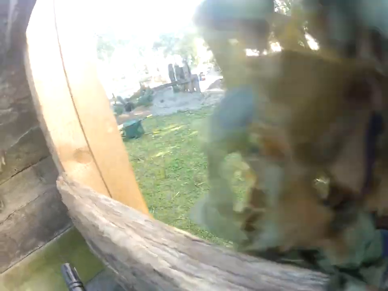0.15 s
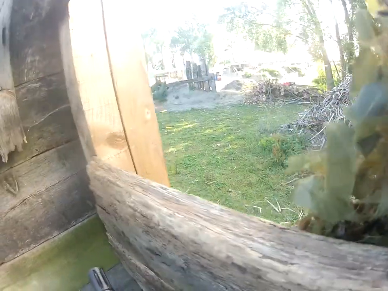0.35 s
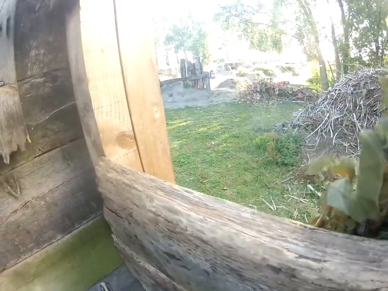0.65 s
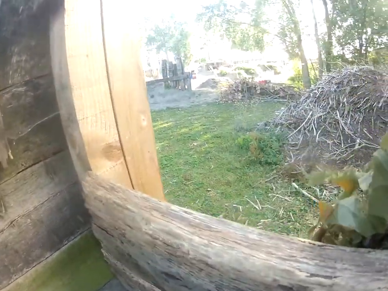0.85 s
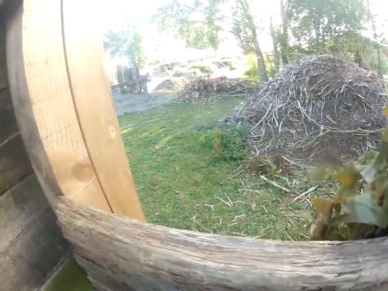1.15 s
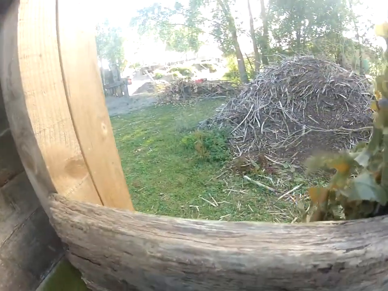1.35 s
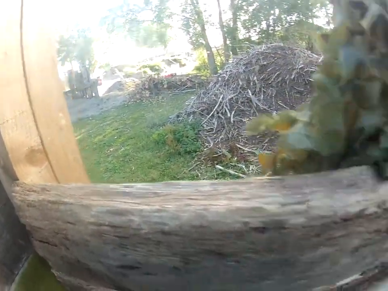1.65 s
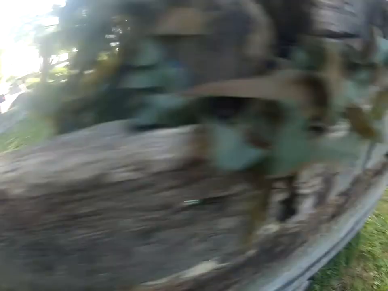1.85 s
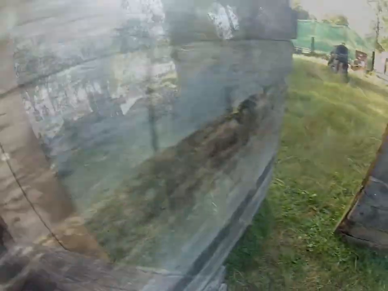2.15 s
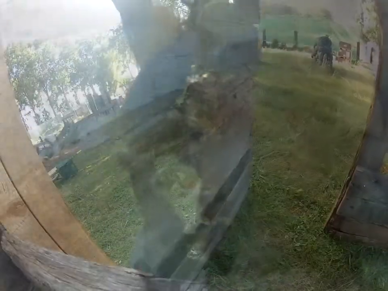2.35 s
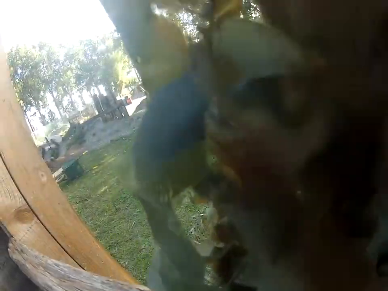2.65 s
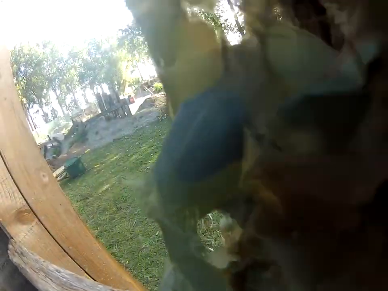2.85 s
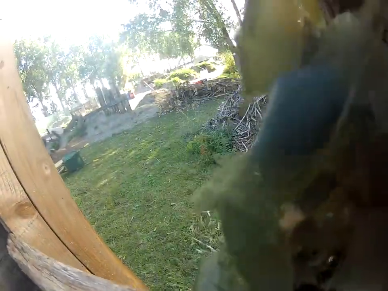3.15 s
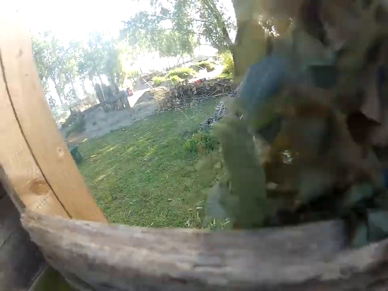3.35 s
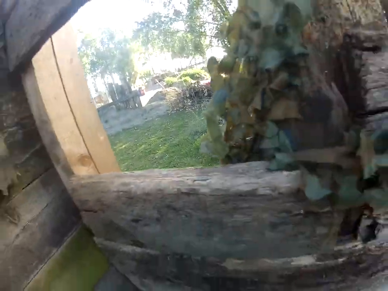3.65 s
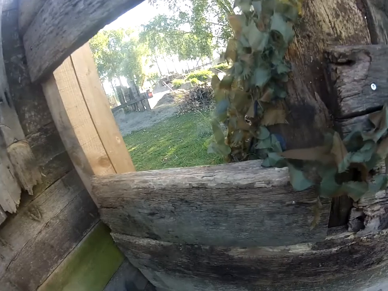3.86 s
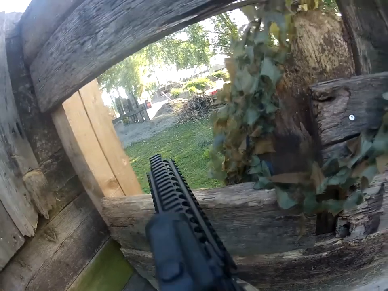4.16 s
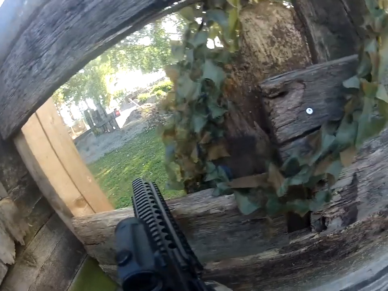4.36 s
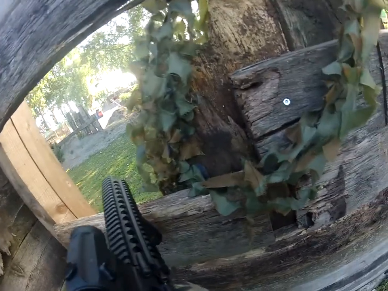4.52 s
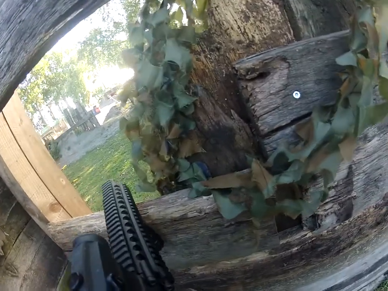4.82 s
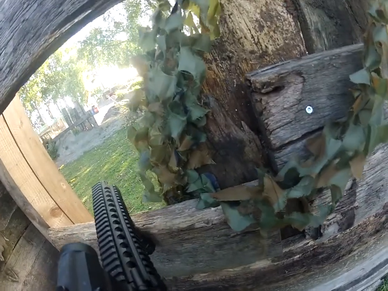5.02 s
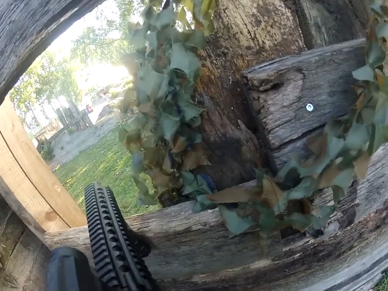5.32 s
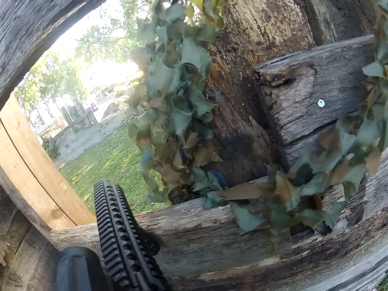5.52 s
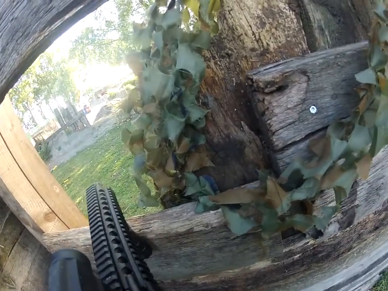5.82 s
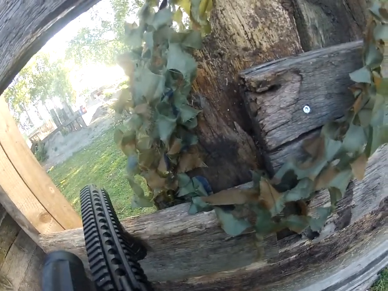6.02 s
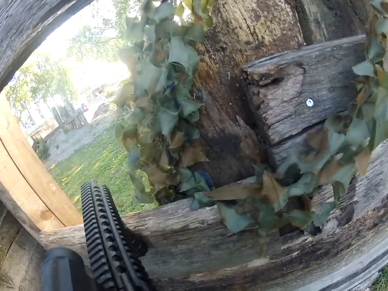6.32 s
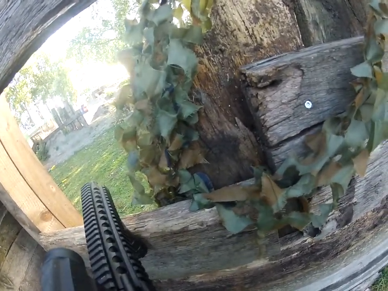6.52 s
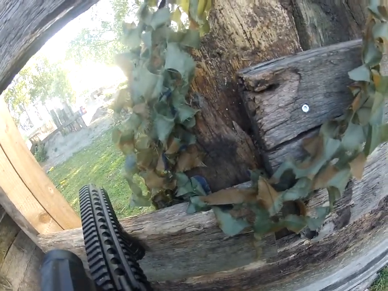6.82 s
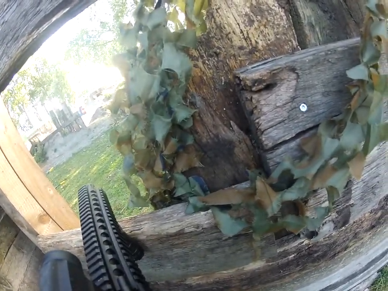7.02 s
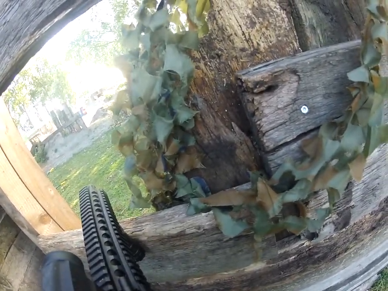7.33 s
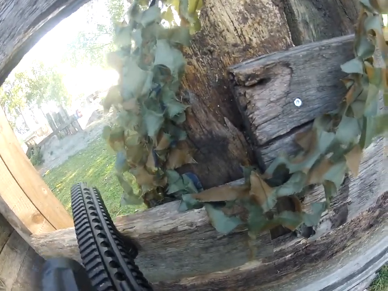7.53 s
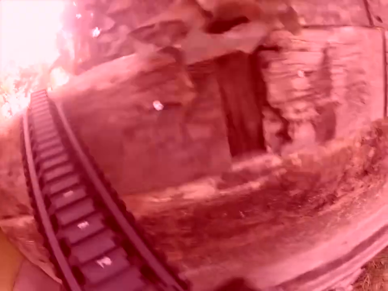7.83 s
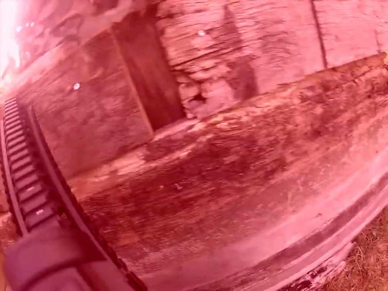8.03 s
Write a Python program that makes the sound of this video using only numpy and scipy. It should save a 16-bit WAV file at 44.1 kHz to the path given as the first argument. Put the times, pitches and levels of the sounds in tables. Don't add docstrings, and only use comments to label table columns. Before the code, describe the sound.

A close, muffled head-camera sound outdoors, sealed in resonant plastic. From 0 to 4 seconds there is faint low hush, soft strap wobble and sparse gear ticks: a click at 0.2, a double tick at 1.0, a scrape with thin webbing squeaks around 1.75 to 2.3, a dull bump at 2.6, and light netting rustle near 3. Heavier low jolts and knocks come at 4.25 to 4.6, with smaller ones to 5.6. From 5.8 to 6.9 an electric airsoft rifle fires six single shots about 0.2 seconds apart, each a brief motor whir, gear rasp and bright piston clack with ringing. Knocks follow at 7.06 and 7.24. At 7.4 a seventh pull is masked by a pellet crack at 7.44; others hit at 7.66, 7.81 and 7.93, shrill and distorted, with deep thumps, scraping and rattling as the head flinches. The level ducks, then fades to hush after 8.

```python
import sys
import numpy as np
from scipy import signal
from scipy.fft import rfft, irfft, next_fast_len
from scipy.io import wavfile
from scipy.ndimage import uniform_filter1d, map_coordinates

SR = 44100
rng = np.random.default_rng(int(sys.argv[2]) if len(sys.argv) > 2 else 0)


def natural_amplitude(level_db):
    exponent = np.asarray(level_db, float) / 20
    return 10 ** exponent


def transcribe(u):
    v = np.clip(np.atleast_2d(u).T, -1, 1)
    q = np.round(v * 32767).astype(np.int16)
    wavfile.write(sys.argv[1], SR, q)


N = 360738


def unit(x):
    return x / np.sqrt(np.mean(x ** 2) + 1e-20)


def seconds():
    return np.arange(N) / SR


def sine(hz, start_s=0.):
    return np.sin(2 * np.pi * hz * (seconds() - start_s))


def along(points, hz):
    f, v = np.transpose(points)
    return np.interp(np.log(hz + 1), np.log(f + 1), v)


def wobble(rate_hz):
    knots = rng.standard_normal(int(N * rate_hz / SR) + 4)
    return map_coordinates(knots, [np.arange(N) * rate_hz / SR])


def filtered(x, response):
    m = next_fast_len(N + SR // 2)
    return irfft(rfft(x, m) * response(np.fft.rfftfreq(m, 1 / SR)), m)[..., :N]


def mode(f, hz, width_hz):
    return 1j * f * width_hz / (hz * hz - f * f + 1j * f * width_hz)


def burst(s, db, t60, hold=0., rise=0.000089):
    out, t = np.zeros(N + SR), np.arange(SR // 2) / SR
    decay = natural_amplitude(db - 60 * np.clip(t - hold, 0, 1) / t60)
    out[round(s * SR):][:len(t)] = decay * (1 - np.exp(-t / rise))
    return out[:N]


def swells(rows, rise_db_s, fall_db_s):
    t, out = seconds(), np.full((2, N), -120.)
    for s, hold, *db in rows:
        before = rise_db_s * np.clip(s - t, 0, None)
        after = fall_db_s * np.clip(t - s - hold, 0, None)
        out = np.maximum(out, np.c_[db] - before - after)
    return uniform_filter1d(out, size=131, axis=1)


def grit(lumpy_db):
    return unit(rng.standard_normal(N) * natural_amplitude(lumpy_db * wobble(500)))


# (frequency [Hz], width [Hz], level [dB])
CASE = [(1004, 370, -9), (1230, 130, -3.5), (1900, 184, 3), (2370, 110, -0.5), (2800, 240, -10),
        (3370, 160, -11.5), (3660, 120, -6), (4900, 100, -29), (5430, 560, -17.5)]


def case(x):
    def ring(f):
        return sum((-1) ** k * natural_amplitude(db) * mode(f, hz, width) for k, (hz, width, db) in enumerate(CASE))
    return filtered(x, ring)


# (frequency [Hz], level [dB])
EDGE = [(1500, -23), (2500, -2.5), (3500, 1), (4500, -10.5), (5500, -2)]


def edge():
    return unit(filtered(grit(lumpy_db=2.5), lambda f: natural_amplitude(along(EDGE, f))))


# (frequency [Hz], density [dB per Hz])
AIR = [(15, -27.5), (25, 3.5), (64, -10.5), (82, -4), (113, -11.5), (289, -11), (388, -15), (657, -22),
       (720, -24), (1190, -25), (1920, -24.5), (5260, -32.5), (5900, -35.5), (7670, -85.5), (13000, -120)]


def air():
    hush = unit(filtered(rng.standard_normal(N), lambda f: natural_amplitude(along(AIR, f))))
    return natural_amplitude(-63 + 0.35 * wobble(8.4)) * hush


# (time [s], hold [s], sway [dB], knock [dB])
BUMPS = [(.02, 0.0085, -60, -62), (.14, 0.032, -58, -73), (.4, 0.026, -55.5, -64), (.92, .01, -73, -70),
         (.99, 0.065, -63, -73), (1.28, 0.019, -61, -72), (1.51, .03, -71, -80), (1.73, 0.065, -65, -58.5),
         (1.82, 0.19, -56, -59.5), (2.49, 0.023, -62, -69), (2.6, 0.018, -44.5, -48), (3.0, .01, -67, -76),
         (3.435, 0.0081, -52.5, -63), (3.56, .01, -57, -70), (3.7, .04, -60, -78),
         (3.935, 0.012, -59.5, -60), (4.18, 0.022, -61, -68), (4.27, 0.086, -34, -45),
         (4.425, 0.0056, -28.5, -41.5), (4.49, 0.019, -43, -44), (4.55, 0.045, -46.5, -47),
         (4.64, 0.056, -58, -48.5), (4.72, 0.014, -45, -52), (4.89, 0.034, -56, -54),
         (4.95, 0.14, -51.5, -54.5), (5.075, 0.016, -44, -43), (5.19, 0.039, -43, -53),
         (5.31, 0.11, -60.5, -60), (5.485, 0.01, -44.5, -56.5), (5.59, 0.057, -53.5, -61.5)]
# (time [s], hold [s], sway [dB], knock [dB])
RECOIL = [(5.808, 0.02, -39, -37), (5.861, 0.0081, -31.5, -32.5), (6.017, 0.075, -26.5, -31.5),
          (6.21, 0.005, -24, -30), (6.277, 0.019, -34.5, -34.5), (6.405, 0.08, -25, -32),
          (6.641, 0.054, -26, -33), (6.735, 0.0086, -28.5, -42), (6.8, 0.021, -41.5, -56),
          (6.864, 0.052, -40, -32.5), (6.935, 0.039, -29, -46), (7.401, 0.029, -33.5, -33.5),
          (7.465, 0.0085, -35, -45), (7.514, 0.074, -39.5, -47), (7.682, 0.067, -44, -43),
          (7.841, 0.059, -18, -26), (7.953, 0.042, -41, -47), (8.06, 0.068, -62, -59)]
SHAKE_RISE_DB_S, BUMP_FALL_DB_S, RECOIL_FALL_DB_S = 2100, 380, 227
REST_DB = -72.5


def shaking():
    bumps = swells(BUMPS, SHAKE_RISE_DB_S, BUMP_FALL_DB_S)
    recoil = swells(RECOIL, SHAKE_RISE_DB_S, RECOIL_FALL_DB_S)
    tremor = REST_DB + 4 * np.array([wobble(9.7), wobble(11)])
    sway_db, knock_db = np.max([bumps, recoil, tremor], axis=0)
    sway_hz = 58 * natural_amplitude(1.1 * wobble(14))
    sway = np.sqrt(2) * np.sin(2 * np.pi * np.cumsum(sway_hz) / SR) * natural_amplitude(2 * wobble(25))

    def strap(f):
        return (mode(f, 61, 69) - natural_amplitude(-0.5) * mode(f, 161.6, 74)) * mode(f, 139.3, 400) ** 3
    loose = filtered(rng.standard_normal(N), strap)
    loose /= np.sqrt(np.abs(uniform_filter1d(loose ** 2, round(0.023 * SR))))
    return natural_amplitude(sway_db) * sway + natural_amplitude(knock_db) * loose


# (time [s], peak [dB], brightness [dB], own note [Hz], note level [dB])
TICKS = [(0.197, -42, -3, 1925, -5), (1.004, -51, -22, 3620, 11), (1.005, -48.5, -19, 1790, 2.5),
         (1.339, -66, -14, 3700, -5), (1.714, -59, -23, 1230, -1.5), (1.75, -59, -7, 1930, 6),
         (1.759, -45.5, -32, 1596, 2), (1.762, -55.5, -18, 3680, 11.5), (1.861, -55, -18, 1190, -10),
         (1.957, -80, -1, 1800, -16), (2.014, -66, -6, 1850, -11), (2.155, -61.5, -19, 1920, 3.5),
         (2.279, -71, -13, 1110, -4), (2.896, -56.5, -19, 1900, -5), (3.168, -66, -12, 2400, -9),
         (4.268, -37, -20, 1786, -9), (4.311, -58, -26, 1240, 6.5), (4.46, -65, -33, 1123, 14.5),
         (4.552, -56.5, -7, 719, -17), (4.73, -64, -5, 1810, -9), (4.899, -70, 3, 770, -6),
         (5.26, -57.5, -20, 1060, 4.5), (5.288, -42, -10, 1737, -6.5), (5.607, -41, -6.5, 1790, -5.5)]
# (time [s], peak [dB], brightness [dB], own note [Hz], note level [dB])
KNOCKS = [(5.92, -58, 7, 2800, -7), (5.938, -40.5, -9, 1850, -19), (6.521, -42.5, -9, 738, -26),
          (6.745, -46, -23, 1880, -6), (7.064, -34, -7, 1850, -9), (7.238, -33, -5.5, 3150, -6),
          (7.571, -54.5, -22, 675, 3.5), (7.623, -32.5, -2, 2375, -9), (7.855, -23, -19, 1475, 7),
          (7.883, -22.5, -24, 1875, 2), (7.866, -46.5, 11, 4500, -12), (7.893, -44.5, 9, 4500, -12.5),
          (7.906, -45, 8.5, 1900, 4), (7.938, -27, -11.5, 1783, 1), (7.961, -40.5, -10, 1023, -4)]
TICK_T60_S, KNOCK_T60_S = 0.043, 0.053


def ticks():
    ring, bright, notes = np.zeros((3, N))
    for rows, t60 in ((TICKS, TICK_T60_S), (KNOCKS, KNOCK_T60_S)):
        for s, db, bright_db, hz, note_db in rows:
            ring += burst(s, db, t60, hold=0.0025)
            bright += burst(s, db + bright_db + 2.5, 0.61 * t60, hold=0.0025)
            note_t60 = t60 * min(1, 1900 / hz)
            notes += burst(s, db + note_db, note_t60, hold=3.3 / max(hz, 1700)) * sine(hz, s)
    ring = natural_amplitude(8.0) * case(ring * grit(lumpy_db=0.0))
    return ring + natural_amplitude(4.5) * bright * edge() + notes * natural_amplitude(4.4 * wobble(720))


# (centre [s], length [s], note
# [Hz], level [dB])
SCRAPES = [(1.012, 0.011, 2640, -48.5), (1.017, .014, 1870, -55), (1.747, 0.022, 4900, -62),
           (1.763, 0.0089, 650, -41.5), (1.764, 0.0057, 1160, -39.5), (1.961, 0.013, 4730, -60),
           (2.901, .006, 3500, -67), (3.079, 0.078, 2050, -64), (3.168, 0.012, 3900, -64),
           (3.203, 0.066, 2400, -71), (4.294, 0.035, 570, -53.5), (4.433, 0.031, 596, -58),
           (4.465, 0.016, 900, -72),
           (7.516, 0.039, 1900, -57), (7.56, 0.033, 1900, -61), (7.753, 0.027, 2200, -38.5),
        (7.445, 0.0067, 330, -19), (7.818, 0.0079, 280, -14), (7.84, 0.015, 1700, -24.5),
        (7.844, 0.0076, 3600, -37), (7.864, 0.004, 4000, -40.5), (7.859, 0.0056, 1390, -8.5),
        (7.864, .003, 4480, -33.5), (7.869, 0.047, 1200, -27.5), (7.885, .004, 3210, -29),
        (7.895, 0.0032, 4500, -40), (7.904, 0.0043, 4500, -38), (7.917, 0.03, 1500, -31),
        (7.922, 0.014, 3160, -43), (7.936, 0.014, 3670, -51.5), (7.94, 0.0037, 3480, -32.5),
        (7.977, 0.012, 1680, -58.5), (7.986, 0.012, 4420, -54), (8.022, 0.0057, 4290, -55),
        (8.041, 0.044, 1700, -55),
           (.2, .01, 2600, -52), (0.201, 0.0092, 1400, -56), (1.356, .012, 3700, -62.5),
           (1.402, .008, 3400, -65.5), (1.007, 0.0086, 2920, -46), (1.861, .006, 2400, -62),
           (1.762, 0.0069, 855, -44), (1.763, 0.009, 1500, -41), (2.9, .006, 2300, -64),
           (4.27, .012, 1310, -49), (7.239, 0.0054, 3300, -37), (7.397, 0.0074, 3190, -32),
           (7.421, .005, 2990, -32), (7.574, 0.01, 557, -45), (7.858, .005, 1800, -17),
           (7.886, .005, 1900, -20), (7.885, .004, 3590, -27.5)]
# (centre [s], length [s], note [Hz], level [dB])
SQUEAKS = [(1.776, 0.12, 1160, -61), (1.787, .07, 1900, -72), (1.89, 0.19, 1230, -67),
           (1.7, 0.14, 1890, -68.5), (2.04, .04, 1930, -72), (2.122, 0.18, 1800, -70),
           (2.11, .08, 1090, -73), (2.265, .03, 4570, -73), (2.28, 0.033, 1100, -67), (1.8, .01, 4900, -72),
           (2.015, .012, 4600, -72), (7.831, 0.014, 2440, -15.5), (7.829, .016, 1950, -26),
           (7.843, .014, 3750, -38.5), (7.888, 0.01, 1177, -22), (7.889, .012, 1876, -27),
           (7.9, 0.025, 1870, -29.5), (7.913, 0.04, 1189, -19.5), (7.928, 0.015, 1810, -19),
           (7.92, 0.022, 2600, -22.5), (7.926, 0.013, 3400, -41)]


def scrapes():
    t, noise, out = seconds(), grit(lumpy_db=3), np.zeros(N)
    for rows, sharp_q in ((SCRAPES, 2.6), (SQUEAKS, 10)):
        for s, length, hz, db in rows:
            peak = signal.iirpeak(hz, sharp_q, SR)
            note = unit(signal.lfilter(*peak, signal.lfilter(*peak, noise)))
            out += natural_amplitude(db) * np.exp(-((t - s) / (0.33 * length)) ** 2) * note
    return out


# (time [s], hold [s], dull [dB], bright [dB])
RUB = [(1.78, 0.083, -70.5, -80), (1.85, 0.17, -71.5, -74), (2.07, 0.12, -75, -84), (2.28, 0.021, -72, -70),
       (2.92, 0.13, -81, -71.5), (3.06, 0.099, -88, -68), (3.16, 0.075, -83, -70),
       (4.46, 0.0082, -65.5, -87), (4.555, 0.026, -70, -70), (4.74, 0.017, -86, -62),
       (7.49, 0.13, -64.5, -59), (7.745, 0.029, -47.5, -45.5), (7.83, 0.012, -22, -38),
       (7.86, 0.028, -45, -43), (7.9, 0.027, -25, -44)]


def rubbing():
    dull_db, bright_db = swells(RUB, rise_db_s=1200, fall_db_s=1800)
    slips = natural_amplitude(3.5 * wobble(120))
    dull = filtered(case(grit(lumpy_db=1.5)), lambda f: mode(f, 900, 1600) ** 2)
    return slips * (natural_amplitude(dull_db) * unit(dull) + natural_amplitude(bright_db) * edge())


# (time [s], peak [dB], frequency [Hz])
JOLTS = [(2.596, -47, 109), (4.259, -22, 125), (4.314, -18.5, 118), (4.417, -26, 105), (4.545, -28, 125),
         (4.892, -42, 126), (5.074, -46, 130), (5.805, -27, 132), (5.866, -17, 100), (5.938, -28, 160),
         (6.009, -18.5, 188), (6.196, -23, 194), (6.394, -21.5, 155), (6.628, -33, 109),
         (6.664, -16.5, 146), (6.856, -20, 150), (7.395, -23, 151.5), (7.853, -1.5, 171),
         (7.883, -2.5, 205)]
# (time [s], peak [dB], frequency [Hz])
FLINCH = [
    (7.816, -4, 48.5),
    (7.859, -13, 37.5),
    (7.893, -6, 42.5),
]


def jolts():
    return sum(-burst(s, db - 3.5, t60=9 / hz, rise=0.0014) * sine(hz, s) for s, db, hz in JOLTS + FLINCH)


# (time [s], peak [dB])
RATTLE = [(7.8083, -10), (7.8381, -35.5), (7.8418, -33), (7.8636, -32.5), (7.8837, -33), (7.9046, -35.5),
          (7.9151, -35.5), (7.9226, -21), (7.9351, -13.5)]
# (time [s], peak [dB])
RUSTLE = [(2.8973, -55), (2.9262, -63), (3.005, -59), (3.0669, -56), (3.1203, -59), (3.1512, -59),
          (3.1682, -51.5), (3.218, -60), (3.2455, -61)]


def rattle():
    near = sum(burst(s, db - 1, t60=.012, hold=.0008) for s, db in RATTLE)
    soft = sum(burst(s, db - 9.5, t60=0.027, hold=.002) for s, db in RUSTLE)
    soft_noise = unit(filtered(grit(lumpy_db=0.5), lambda f: mode(f, 2960, 2200) ** 2))
    return near * edge() + soft * soft_noise


# (gear catches piston [s], piston slams [s], motor [dB], slam [dB])
SHOTS = [
    (5.8007, 5.8646, -43, -21.5),
    (6.0086, 6.0664, -43, -21),
    (6.1954, 6.2537, -43.5, -21),
    (6.393, 6.4525, -43.5, -20.5),
    (6.625, 6.6833, -43.5, -20.5),
    (6.8558, 6.915, -43, -20.5),
    (7.3928, 7.444, -43, -54),
]
# (time after catch [s], level [dB])
PULL = [(0, 0.5), (.003, 2.5), (.008, -5.5), (.022, -9), (.034, -12), (.041, -0.5), (.046, 6), (.052, 0),
        (.058, -12)]
# (time after catch [s], level [dB], hold [s])
CATCHES = [(.0075, -3.5, 0.00055), (0.025, 0.5, 0.0024), (0.036, 1.5, .002), (0.0427, 1, .0006),
           (0.0476, 5, .0015)]
# (frequency [Hz], level [dB], t60 [s])
SHELL = [(1150, -17, .025), (1930, -4, .05), (2340, -9, .03), (2820, -5, .03), (3250, -6, .024),
         (3760, -3, .022), (4510, -6, .014), (5090, -5, .014)]
# (frequency [Hz], level [dB], t60 [s])
SPRING = [(2830, -29, .3), (3740, -29, .28)]
TRIGGER_S, SPIN_S, RASP_DB = 0.05, 0.029, -30.5


def rifle():
    t, pull = seconds(), np.transpose(PULL)
    motor, rasp, snaps, slam, whine = np.zeros((5, N))
    for catch, hit, motor_db, slam_db in SHOTS:
        trigger, spin = catch - TRIGGER_S, catch - SPIN_S
        times = [trigger, trigger + 0.0055, spin, spin + .004, catch, hit + 0.036, hit + 0.078, hit + 0.14]
        wind_up_db = motor_db + np.array([-6, -7.0, 1.0, 3, 6.5])
        coast_db = slam_db - np.array([22, 38, 50])
        motor += natural_amplitude(np.interp(t, times, [*wind_up_db, *coast_db], -120, -120))
        rasp += natural_amplitude(RASP_DB + np.interp(t - catch, *pull, -120, -120))
        for s, db, hold in CATCHES:
            snaps += burst(catch + s, RASP_DB + db + rng.normal(0, 1.1), t60=0.026, hold=hold)
        slam += burst(hit + .0003, slam_db - 11, t60=.05, hold=.003)
        slam += burst(hit + 0.0099, slam_db - 37.5, t60=0.23)
        for hz, db, t60 in SHELL:
            ring = burst(hit + .0004, slam_db + db + rng.normal(0, 1), t60, hold=.0025, rise=.0003)
            whine -= ring * np.cos(2 * np.pi * hz * (t - hit - .001))
        for hz, db, t60 in SPRING:
            ring = burst(hit + .001, slam_db + db + rng.normal(0, 2), t60, rise=.0015)
            whine += ring * np.sin(2 * np.pi * hz * t + 1.5 * wobble(90))
        pitch_hz = np.interp(t, [spin, catch - .008], [1150, 1520])
        swell = np.sin(np.pi * np.clip((t - spin + .004) / (catch - spin - 0.004), 0, 1))
        pinion = np.sin(2 * np.pi * np.cumsum(pitch_hz) / SR + 1.1 * wobble(250))
        whine += natural_amplitude(motor_db - 4 + 4 * wobble(200)) * swell * pinion
    tooth = np.cumsum(236 + 40 * wobble(90)) / SR % 1
    teeth = unit(natural_amplitude(-15 * tooth + 2 * wobble(200)))
    gears = (motor + rasp * teeth + snaps) * grit(lumpy_db=0)

    def gearbox(f):
        return mode(f, 2900, 2200) ** 2 + natural_amplitude(-10.5) * mode(f, 510, 120) + natural_amplitude(-7) * mode(f, 1040, 150)
    train = natural_amplitude(3.5) * case(gears) + filtered(gears, gearbox)
    thud = natural_amplitude(18.5) * case(slam * grit(lumpy_db=0.5))
    return train + thud + (natural_amplitude(9.5) * slam + natural_amplitude(-1.0) * snaps) * edge() + whine


# (time [s], contact [s], thump [dB], thump [Hz])
PELLETS = [
    (7.4448, 0.0055, -6.5, 175.6),
    (7.6607, 0.0041, -9.5, 210),
    (7.809, 0.0059, 4.5, 197.4),
    (7.935, 0.0028, -9.5, 200),
]
# (frequency [Hz], level [dB])
WALLS = [
    [(1210, -11.5), (1940, -9.5), (2850, -7), (3300, -10.5), (3770, -5)],
    [(560, -15), (1890, 0.5), (2600, -11.5), (3110, -12.5), (3730, -8.5)],
    [(1170, -9.5), (1750, -6), (2420, -2.5)],
    [(1100, -1.5), (1820, -0.5), (2290, -8), (3830, -15.5)],
]
# (time [s], frequency [Hz], level [dB], t60 [s])
BUCKLE = [
    (6.945, 2830, -50, .3),
    (6.945, 3740, -55, .4),
    (7.46, 705, -48, .7),
    (7.67, 850, -43, .2),
    (7.685, 2140, -51, .3),
]


def pellets():
    crack, out = np.zeros((2, N))
    pellet_db = 0.5
    for (s, contact, thump_db, thump_hz), wall in zip(PELLETS, WALLS):
        t = seconds() - s
        blow = burst(s, pellet_db, t60=0.0073, hold=contact, rise=.0001)
        crack += blow
        for hz, note_db in wall:
            level = natural_amplitude(note_db + 1.5 * wobble(500))
            out += blow * level * np.sin(2 * np.pi * hz * t + .35 * wobble(500))
        tail = burst(s, pellet_db - 27.5, t60=0.038, hold=contact)
        out += tail * sum(sine(hz, s) for hz in (520, 1150, 2300))
        thump = burst(s, thump_db, t60=0.0081, hold=contact + 0.002, rise=0.003)
        out -= thump * sine(thump_hz, s)
    for s, hz, db, t60 in BUCKLE:
        out += burst(s, db, t60, rise=.006) * sine(hz)
    ring = natural_amplitude(6) * case(crack * grit(lumpy_db=1.5))
    broad = natural_amplitude(-2.0) * filtered(crack * grit(lumpy_db=0.5), lambda f: mode(f, 2300, 2700))
    return out + ring + natural_amplitude(-6.5) * crack * edge() + broad


def scene():
    handling = air() + shaking() + ticks() + scrapes() + rubbing() + jolts() + rattle()
    return (handling + rifle() + pellets())[None]


def band_limit(x):
    return signal.sosfilt(signal.butter(12, 16500, fs=SR, output="sos"), x)


def record(dry):
    over = np.roll(np.abs(dry) > .7, round(.007 * SR), axis=1)
    duck = signal.lfilter([1], [1, -np.exp(-1 / (.035 * SR))], over)
    x = dry * natural_amplitude(-11 * np.tanh(duck / 12))
    x = x / (1 + np.abs(x / .58) ** 8) ** (1 / 8)
    x = filtered(x, lambda f: 1 / (1 + (f / 5750) ** 40))
    hold_hz, hold_phase_rad = 12000, -2.19
    mirrored = x * (1 + 2 * np.cos(2 * np.pi * hold_hz * seconds() + hold_phase_rad))
    # (frequency [Hz], level [dB])
    colour = [(10900, 1.0), (11300, -0.5), (12000, 3), (12700, -1.5), (13000, 2.5), (14800, 3.5),
              (15300, -1.0), (15800, -27.5), (16500, -33.0), (16700, -90.5)]
    held = filtered(mirrored, lambda f: np.sinc(f / hold_hz) * natural_amplitude(along(colour, f)))
    held = held / (1 + np.abs(held / .75) ** 12) ** (1 / 12)
    return band_limit(held)


dry = scene()
out = record(dry)
transcribe(out)
```